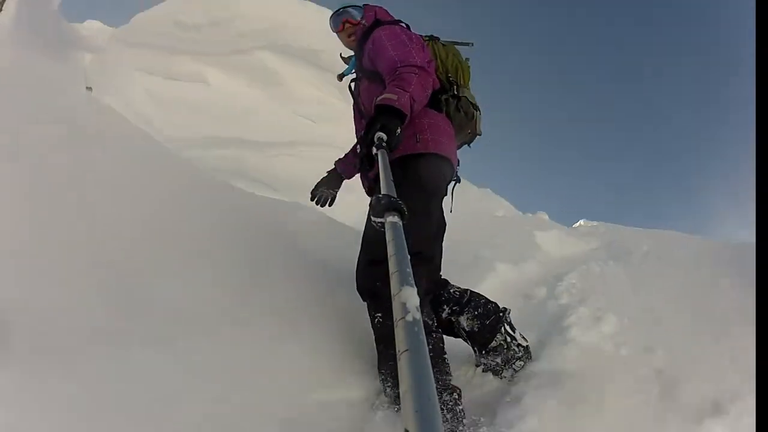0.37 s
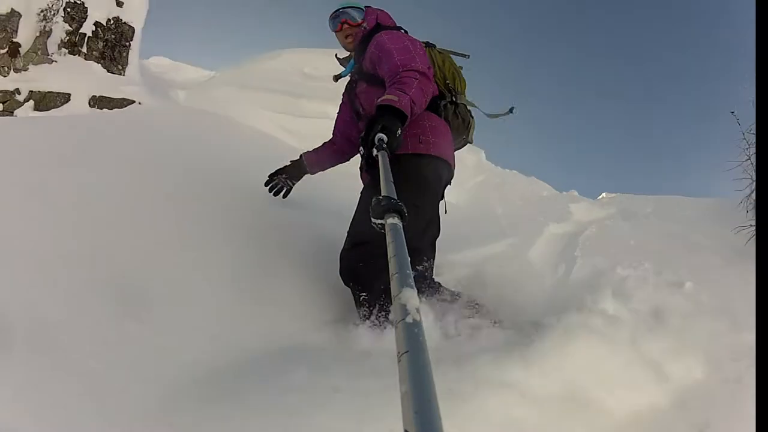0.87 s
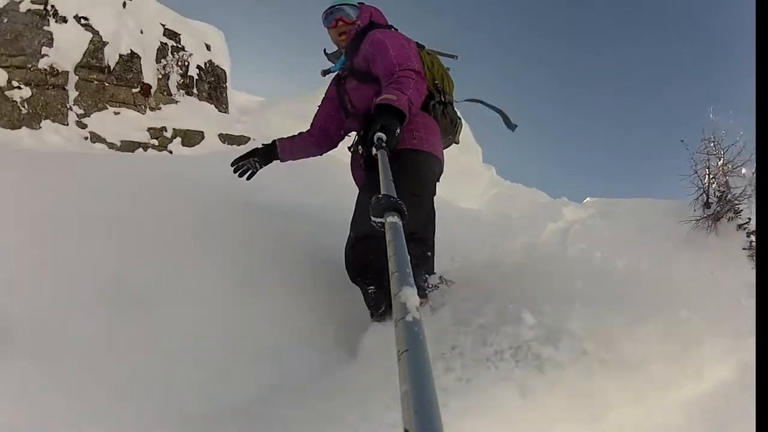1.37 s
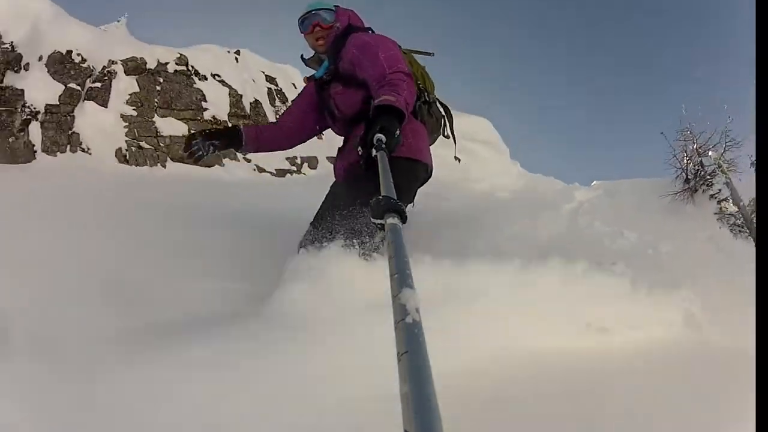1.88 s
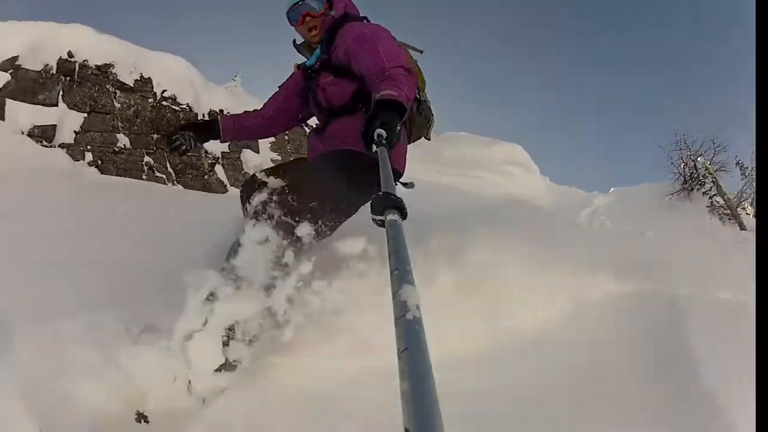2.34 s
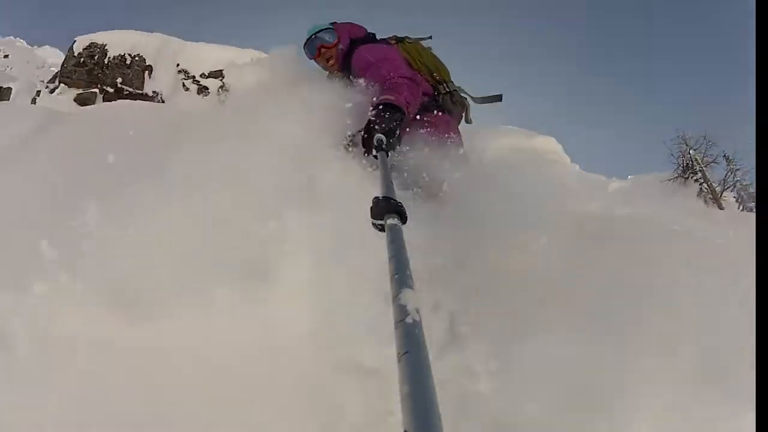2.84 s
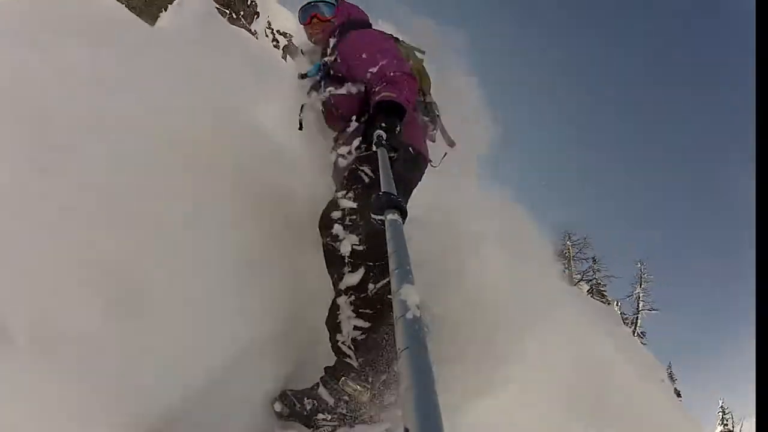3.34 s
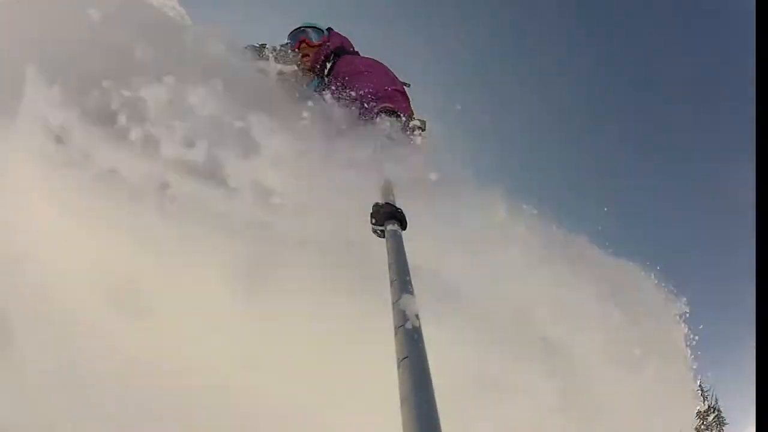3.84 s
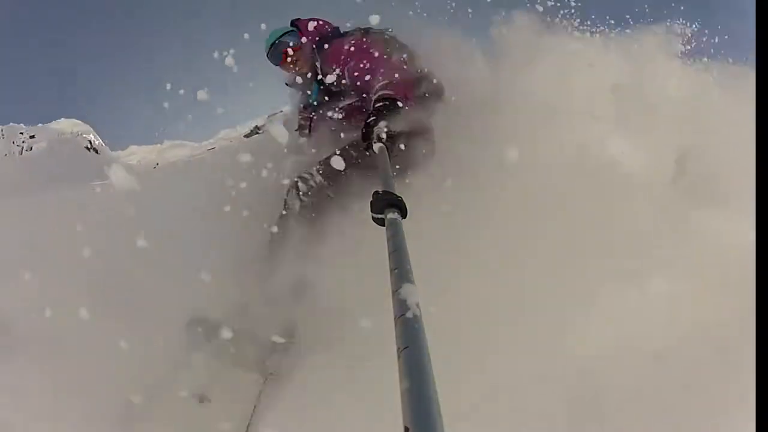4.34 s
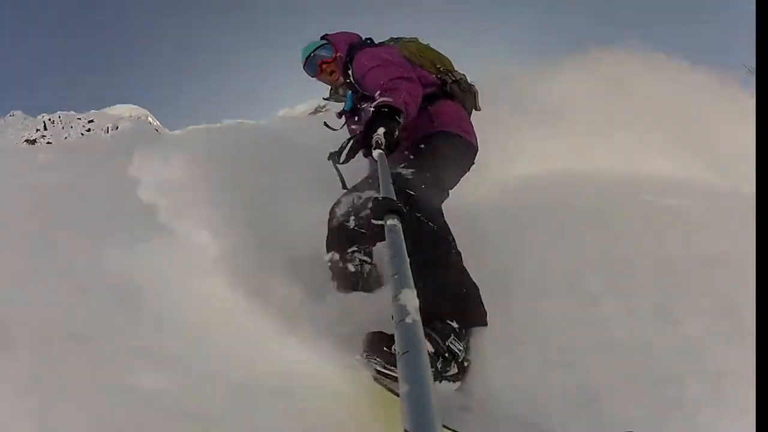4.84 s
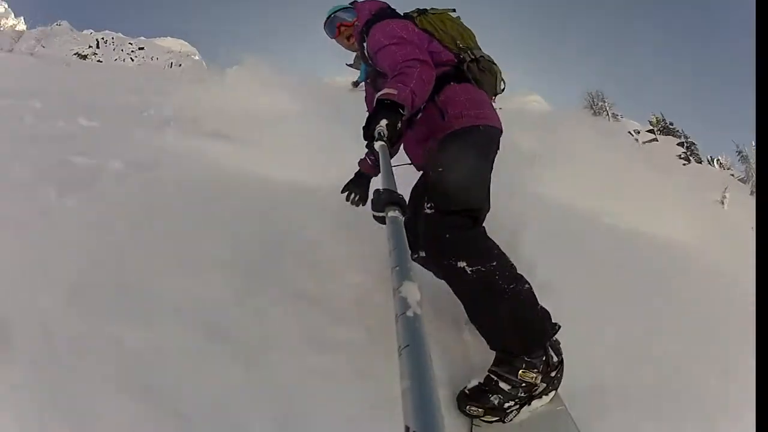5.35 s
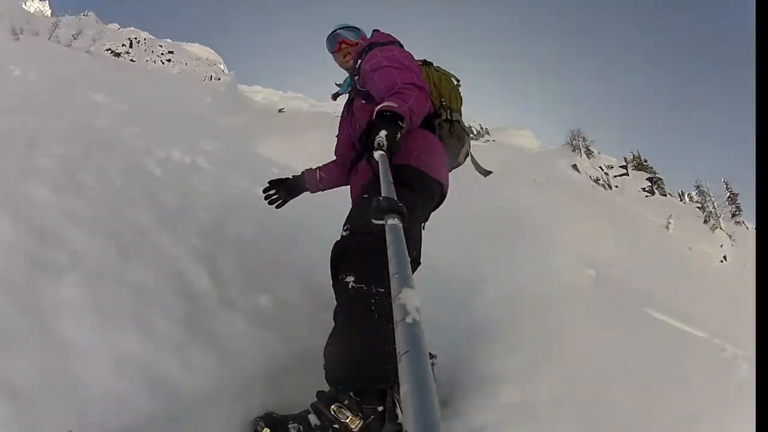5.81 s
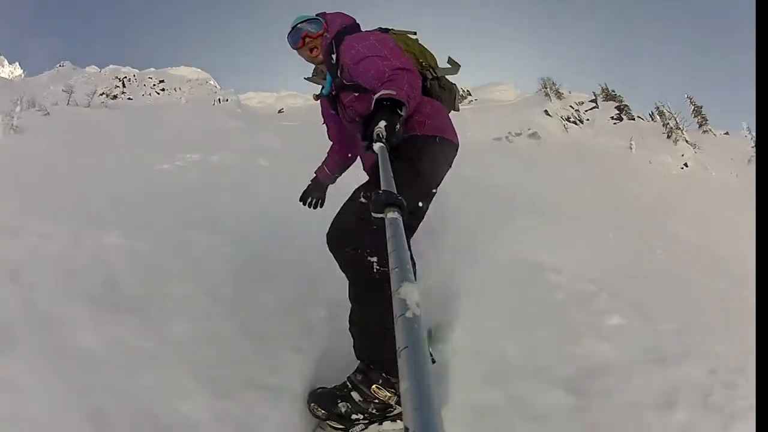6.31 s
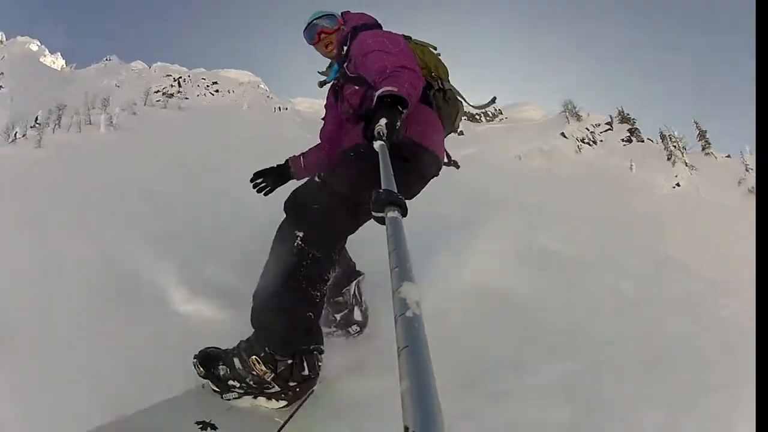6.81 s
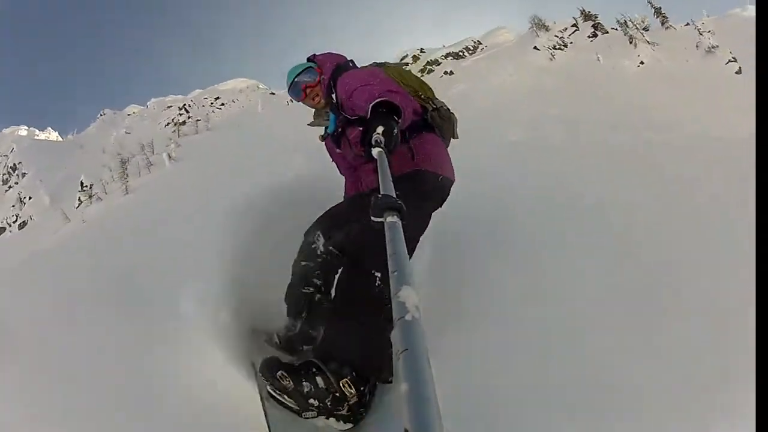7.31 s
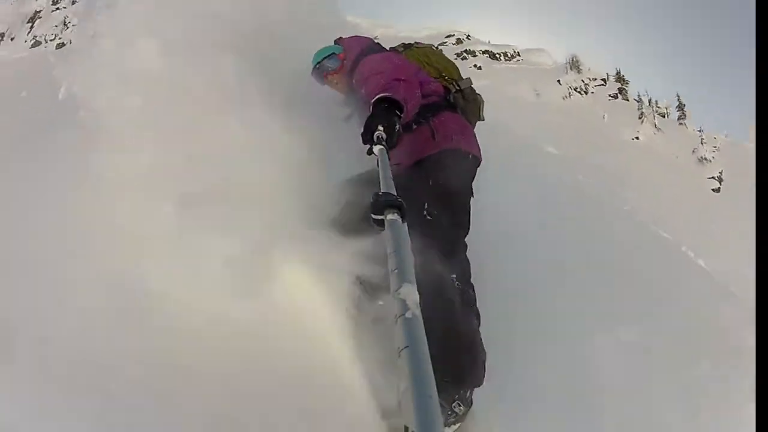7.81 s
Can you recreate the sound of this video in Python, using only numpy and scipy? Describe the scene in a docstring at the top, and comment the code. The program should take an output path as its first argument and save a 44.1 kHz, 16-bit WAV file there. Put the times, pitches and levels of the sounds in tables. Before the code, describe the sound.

Snowboard hissing through deep powder, heard from inside a sealed camera housing, faint at first, then louder, with thumps, knocks, ticks and wind rumble.

```python
"""A deep powder slope, heard from inside a sealed camera housing that a snowboarder holds on a pole.
Wind thumps the housing and rumble comes and goes; the board hisses and crackles, the pole hums with shocks.
Snow lumps knock, ice crumbs tick, the latch rattles, powder spatters, the arm jolts and the mount squeaks.
Noise follows tables of spectrum and level; blows and grains ring the modes of the housing's parts.
At the microphone the sound is held sample by sample at 12 kHz, which mirrors it into the treble."""
import sys
import numpy as np
from scipy import signal
from scipy.fft import rfft, irfft, next_fast_len
from scipy.io import wavfile
from scipy.ndimage import uniform_filter1d

SR = 44100
rng = np.random.default_rng(int(sys.argv[2]) if len(sys.argv) > 2 else 0)


def dump(signal):
    """Clip the signal to [-1, 1] and save it as 16-bit WAV at the path in sys.argv[1]."""
    limited = np.clip(np.atleast_2d(signal).T, -1, 1)
    pcm = np.round(limited * 32767).astype(np.int16)
    wavfile.write(sys.argv[1], SR, pcm)


def linear_from_db(decibels):
    """Turn decibels (scalar or array-like) into linear amplitude factors; 0 gives 1."""
    return 10 ** (np.asarray(decibels, float) / 20)


N = 360738  # length in samples

# Noise spectra, shape only: f/Hz, level/dB per Hz
WIND_SPECTRUM = [(10, -10), (22, 5), (36, -7.5), (55, -24.5), (100, -30), (300, -45.5), (500, -43),
                 (2000, -86)]
RUMBLE_SPECTRUM = [(40, -32), (75, -7), (110, 6), (150, -19.5), (200, -11), (255, -12), (310, -18.5),
                   (500, -35), (2000, -40)]
AIR_SPECTRUM = [(100, 5.5), (500, -2.5), (1250, -7), (2000, -16), (3600, -8), (5800, -13)]
# The board's hiss as it comes through the housing wall, shape only: f/Hz, level/dB per Hz
HISS_SPECTRUM = [(190, -45), (330, -25), (424, -18.5), (643, -14.5), (797, 1), (1060, -10), (1270, 0.5),
                 (1590, -4), (1930, 0.5), (2330, -3), (2750, -14.5), (3450, -9.5), (3990, -19.5),
                 (4880, -18), (5700, -22), (7410, -102), (12500, -120)]

# Ringing modes of each part of pole and housing: f/Hz, relative level/dB, time to fall by 60 dB/s
PART_MODES = {"pole": [(223.4, 14.5, 0.12), (288.4, 1.5, 0.038)], "mount": [(251.8, 5.5, 0.54)],
              "back": [(529, 2, 0.015), (763, 8, 0.033), (911, -2.5, 0.062), (990, -1, 0.03),
              (1283, 6, 0.034)], "walls": [(1450, 7, 0.013), (1816, 8, 0.024), (2298, 7, 0.021)],
              "lens": [(2670, -1, 0.0013), (3315, -0.5, 0.0094), (4110, -17.5, 0.0091)],
              "latch": [(4540, 5.5, 0.001), (5270, -0.5, 0.012)]}

# How hard the board drives through the powder, as the gain of its hiss: t/s, level/dB
CARVE = [(0.0, -71.5), (0.85, -70), (1.05, -64), (1.4, -72), (2.4, -71.5), (2.74, -62.5), (2.8, -55),
         (3.05, -54.5), (3.22, -49), (3.7, -50.5), (3.95, -49), (4.4, -52.5), (4.65, -51), (5.0, -53.5),
         (5.4, -49.5), (5.52, -45.5), (5.9, -49), (6.22, -42), (6.5, -44.5), (6.8, -39), (7.4, -41.5),
         (7.7, -47), (8.18, -47)]
# Swells in the level of the low wind noise: t/s of the peak, level/dB, length/s
WIND_SWELLS = [(0.9, -37.5, 0.53), (1.58, -37, .15), (1.956, -38.5, 0.35), (2.56, -36, 0.39),
               (3.404, -32.5, .15), (3.708, -28, 0.14), (4.305, -35, 0.42), (4.71, -35.5, 0.28),
               (4.89, -36, 0.19), (5.102, -32.5, 0.16), (5.413, -41, .12), (5.79, -36, 0.17),
               (6.063, -31, 0.47), (6.793, -33, .15), (7.003, -36.5, 0.12), (7.398, -37, 0.29),
               (7.597, -34, 0.15), (8.02, -29, 0.27)]
# The board runs over rough snow: t/s of the peak, level/dB, length/s
BUMPS = [(0.503, -53.5, 0.14), (1.406, -50, 0.095), (1.8, -60, 0.13), (2.236, -46.5, 0.33),
         (2.611, -45.5, 0.14), (2.887, -46, 0.33), (3.69, -39.5, 0.14), (4.05, -39, 0.46),
         (4.632, -48, 0.16), (5.087, -46.5, .12), (5.545, -65, .2), (6.1, -43, 0.17), (6.303, -53, .12),
         (6.732, -36, 0.16), (7.0, -39, 0.2), (7.19, -34.5, 0.18), (7.493, -46.5, .12), (7.944, -44, 0.34)]
# Spells of hard shaking up the arm: t/s of the peak, level/dB, length/s
SHAKES = [(0.695, -58, .2), (1.109, -50.5, 0.11), (1.69, -56, .12), (1.9, -64, .12), (2.324, -54, .12),
          (2.514, -50, 0.094), (2.92, -47, 0.19), (3.185, -46, 0.23), (3.916, -35, 0.16),
          (4.04, -37.5, 0.23), (4.36, -39, .2), (4.695, -44, 0.32), (6.023, -47, .15), (6.458, -44, 0.28),
          (7.1, -41.5, 0.14), (7.643, -41, 0.71), (7.813, -44, 0.17)]

# Lumps of snow and bumps: t/s, back level/dB, pole level/dB, walls level/dB, crumbling/ms
KNOCKS = [(0.0925, -51, -35.5, -53, 1.7), (0.56, -71, -48, -72, 4.1), (2.138, -39.5, -28.5, -40.5, 0.7),
          (2.207, -56, -57, -64, 0.4), (2.258, -61, -39.5, -74, 1.9), (2.316, -49.5, -61, -52, 0.2),
          (2.64, -53, -65, -66, 1.1), (2.69, -55.5, -66, -56, 0.34), (2.82, -71, -67, -48, 0.3),
          (3.568, -69, -36.5, -66, 1.5), (3.8512, -37, -37, -21, 1.64), (3.8695, -17.5, -17.5, -28, 0.96),
          (3.966, -34.5, -31, -38, 2), (3.948, -35, -30, -43, 2.2), (4.006, -45, -22, -47, 2.9),
          (4.027, -47, -28, -50, 1.5), (4.209, -47, -40.5, -45, 1.9), (4.499, -50, -41, -67, 1.6),
          (4.583, -64, -44.5, -38, 0.29), (4.594, -47, -34, -65, 5.5), (5.099, -66, -50, -36.5, 0.19),
          (5.428, -51, -42, -35.5, 0.17), (5.594, -62, -57, -38.5, 0.2), (6.019, -11, -13.5, -19, 0.18),
          (6.0615, -42, -41, -29, 0.25), (6.12, -66, -32.5, -60, 1.8), (6.175, -31.5, -40, -27, 0.53),
          (6.186, -21, -24, -22, 0.2), (6.4015, -34, -38, -26, 0.67), (6.7105, -59, -47, -34, 0.44),
          (6.759, -22, -50, -17.5, 1.6), (6.7635, -31, -25, -21, 0.16), (7.165, -60, -35, -46, 1.3),
          (7.639, -44, -36.5, -52, 1.4), (7.899, -31.5, -24, -23.5, 1.2)]
# The loose latch rattles: t/s, level/dB, rattling/ms
RATTLES = [(1.4187, -55, 4.4), (1.426, -54, 0.46), (1.508, -52.5, 0.36), (1.5205, -59, 1.2),
           (1.5783, -53, .6), (1.9168, -59, .4), (2.2166, -50, 0.67), (2.25, -61, 1.6), (2.3019, -44, 4),
           (2.311, -54, 2.3), (2.399, -48, 1.2), (2.4613, -55, .45), (2.4668, -52.5, 2.1),
           (2.5027, -53, 1.8), (2.5523, -51, 1.5), (2.59, -46.5, 1.5), (2.9465, -59, 1.3),
           (3.034, -51, 0.84), (3.071, -55, 1.1), (3.1266, -56, 2.1), (3.532, -52, 1), (3.7447, -51, 2.2),
           (3.763, -40.5, .8), (5.1233, -47, .5), (5.181, -46.5, .3), (5.2035, -57, 1.2),
           (5.5338, -39.5, 0.74), (6.0035, -51, 1.1), (8.107, -51, .3)]
# Jolts of the arm, one slow swing each: t/s, level/dB, f/Hz
JOLTS = [(1.649, -36, 31), (2.887, -26, 27), (3.684, -32, 27.7), (3.763, -25.5, 27.3), (4.038, -28, 30),
         (4.869, -27, 30), (5.974, -23, 24), (6.045, -20, 25.5), (6.705, -13.5, 36.5), (7.917, -20.5, 33.2)]
# Ice crumbs on the lens cover: t/s, level/dB
CRUMBS = [(2.152, -53), (2.2323, -44), (2.5124, -54), (2.5341, -38.5), (3.087, -41.5), (3.3896, -40.5),
          (3.687, -31), (3.716, -36.5), (3.8515, -24), (4.2156, -33), (4.251, -35.5), (4.299, -40.5),
          (4.4006, -49), (4.434, -53), (4.4457, -38.5), (4.581, -40), (5.3596, -36.5), (6.0193, -31.5),
          (6.0508, -28), (6.1873, -29), (6.4004, -46), (6.4464, -42), (6.7073, -24.5), (6.758, -25),
          (6.7638, -17), (7.8986, -33.5), (7.9056, -35), (7.92, -30), (7.985, -36.5), (8.0403, -36.5),
          (8.082, -51)]
# A cloud of powder pelts the housing: t/s, level/dB
SPATTER = [(3.88, -62), (3.9, -58), (3.945, -40), (3.975, -44), (4.01, -49), (4.07, -49.5), (4.12, -52),
           (4.16, -53)]
# The mount squeaks: t/s, length/s, f/Hz at the start, level/dB
SQUEAKS = [(5.843, 0.026, 2310, -39.5), (5.853, 0.055, 4590, -48), (5.91, .015, 4800, -58),
           (5.94, 0.049, 4680, -56)]

FULL_CARVE_DB = -45  # hiss gain of a full carve
# Beds: level/dB at a full carve, share of the carve's dB changes that the bed follows
WIND_BED, RUMBLE_BED, POLE_BED = (-43, 0.11), (-50.5, 0.5), (-46, 0.56)
AIR_DB = -64.5
RATTLE_LENS_DB, RATTLE_WALLS_DB = -9, -12.5  # relative to the latch
CRUMB_LATCH_DB, CRUMB_WALLS_DB, CRUMB_MS = -18, -7.5, 0.23  # levels relative to the lens cover
HOLD_HZ = 12000
SELF_NOISE_DB = -77  # wide-band hiss of the electronics, ahead of the last low-pass


def evened(x):
    """Scales to rms 1."""
    return x / np.sqrt(np.mean(x ** 2) + 1e-20)


def drift(count, width):
    """Random wander of rms 1, smoothed over a number of points."""
    return evened(uniform_filter1d(rng.standard_normal(count), size=width))


def read_spectrum(points, hz):
    """Reads a spectrum table on a log-frequency axis."""
    f, level = np.transpose(points)
    return np.interp(np.log(hz + 1), np.log(f + 1), level)


def noise(spectrum, size, patchy_db, flicker_db):
    """Random short-time spectra with drifting patches and a flicker shared by all bins."""
    frames = 4 * N // size + 5
    hz = np.fft.rfftfreq(size, 1 / SR)
    real, imaginary, patches = rng.standard_normal((frames, len(hz), 3)).T
    patches = uniform_filter1d(patches, size=8, axis=0)  # across frequency
    patches = evened(uniform_filter1d(patches, size=10, axis=1))  # across time
    flicker = drift(frames, 3)
    level_db = read_spectrum(spectrum, hz)[:, None] + patchy_db * patches + flicker_db * flicker
    bins = (real + 1j * imaginary) * linear_from_db(level_db)
    sound = signal.istft(bins, nperseg=size, noverlap=3 * size // 4)[1]
    return evened(sound[:N])


def carve_db():
    """Hiss gain of the board over time, in dB."""
    return np.interp(np.arange(N) / SR, *np.transpose(CARVE))


def ride(bed, surges):
    """Gain over time: a bed that follows the carve, plus smooth swells around their peaks, added as power."""
    full_db, share = bed
    t = np.arange(N) / SR
    power = linear_from_db(full_db + share * (carve_db() - FULL_CARVE_DB)) ** 2
    for peak_s, peak_db, length in surges:
        power += linear_from_db(peak_db) ** 2 * np.exp(-(4 * (t - peak_s) / length) ** 2)
    return np.sqrt(power)


def ring(force, part):
    """The modes of one part, set ringing by a force; neighbouring modes swing in opposite sense."""
    t = np.arange(SR // 4) / SR
    modes = np.zeros(len(t))
    for k, (hz, db, t60) in enumerate(PART_MODES[part]):
        modes += (-1) ** k * linear_from_db(db - 60 * t / t60) * np.sin(2 * np.pi * hz * t)
    return signal.oaconvolve(force, modes)


def grains(per_s, spread_db, parts):
    """Random small impacts, a few large, ringing the named parts."""
    size = linear_from_db(spread_db * rng.exponential(1, N)) * rng.choice([-1, 1], N)
    hits = size * (rng.random(N) < per_s / SR)
    return evened(sum(ring(hits, part)[:N] for part in parts))


def add(mix, s, sound):
    """Mixes a sound in at s seconds."""
    part = mix[round(s * SR):][:len(sound)]
    part += sound[:len(part)]


def blows(rows, parts, rough, soft_hz):
    """Each blow is a push followed by a few ms of crumbling; it rings each part by its own amount."""
    out = np.zeros(N)
    ms = np.arange(1000) * 1000 / SR
    keep = np.exp(-2 * np.pi * soft_hz / SR)
    for s, *levels_db, length_ms in rows:
        crumbling = np.exp(-(ms / np.clip(length_ms, 0.05, 8) - 0.6) ** 2)
        force = rough * rng.standard_normal(len(ms)) * crumbling
        force[0] = 1
        # a soft body spreads the push in time: two-pole low-pass
        force = signal.lfilter([1], [1, -2 * keep, keep ** 2], force)
        for part, db in zip(parts, levels_db):
            sound = ring(force, part)
            loudest = np.sqrt(uniform_filter1d(sound ** 2, size=140).max())  # rms over about 3 ms
            add(out, s, linear_from_db(db) * sound / loudest)
    return out


def wind():
    """Wind on the housing: low, thumping noise that swells and sinks."""
    return ride(WIND_BED, WIND_SWELLS) * noise(WIND_SPECTRUM, size=4096, patchy_db=1.8, flicker_db=2.0)


def rumble():
    """The board on rough snow: low, flickering noise that grows with the carve."""
    return ride(RUMBLE_BED, BUMPS) * noise(RUMBLE_SPECTRUM, size=1024, patchy_db=0.5, flicker_db=4.0)


def air():
    """Steady air: a faint noise whose mean level does not follow the carve."""
    return linear_from_db(AIR_DB) * noise(AIR_SPECTRUM, size=1024, patchy_db=2.5, flicker_db=1.9)


def pole():
    """Uneven small shocks up the arm keep the low modes of pole and mount humming."""
    shocks = rng.standard_normal(N) * linear_from_db(1.7 * drift(N, 600))
    hum = evened(ring(shocks, "pole")[:N] + ring(shocks, "mount")[:N])
    return ride(POLE_BED, SHAKES) * hum


def board():
    """Powder sliding under the board: a dense hiss with fine crystals crackling in it."""
    hiss = noise(HISS_SPECTRUM, size=512, patchy_db=2.0, flicker_db=0.83)
    crackle = grains(400, 2.0, ("walls", "lens"))
    return linear_from_db(carve_db()) * (1.075 * hiss + 0.28 * crackle)


def knocks():
    """Lumps of snow and bumps: soft blows that ring the back, the pole and the walls."""
    return blows(KNOCKS, ("back", "pole", "walls"), rough=0.17, soft_hz=1600)


def rattles():
    """The loose latch chatters: hard, rough blows that ring the latch and stir the lens cover and walls."""
    rows = [(s, db + RATTLE_LENS_DB, db, db + RATTLE_WALLS_DB, ms) for s, db, ms in RATTLES]
    return blows(rows, ("lens", "latch", "walls"), rough=0.6, soft_hz=4500)


def jolts():
    """One soft pressure swing per jolt of the arm, slightly longer than a full cycle."""
    out = np.zeros(N)
    for s, db, hz in JOLTS:
        turn = np.arange(0, 1.12, hz / SR)  # in cycles
        fade = signal.windows.tukey(len(turn), 0.4) * np.exp(-0.5 * turn)
        add(out, s, linear_from_db(db) * np.sin(2 * np.pi * turn) * fade)
    return out


def crumbs():
    """Ice crumbs tick: hard, short blows that ring the lens cover and stir the latch and walls."""
    rows = [(s, db, db + CRUMB_LATCH_DB, db + CRUMB_WALLS_DB, CRUMB_MS) for s, db in CRUMBS]
    return blows(rows, ("lens", "latch", "walls"), rough=0.6, soft_hz=4500)


def spatter():
    """Powder pelts the housing: dense grains, mostly on the back, swelling and thinning out."""
    s, db = np.transpose(SPATTER)
    level = linear_from_db(np.interp(np.arange(N) / SR, s, db, left=-120, right=-120))
    return level * (grains(93, 3.4, ("back",)) + 0.5 * grains(250, 2.3, ("walls",)))


def squeaks():
    """Short, rough, rising tones from rubbing plastic."""
    out = np.zeros(N)
    for s, length, hz, db in SQUEAKS:
        t = np.arange(0, length, 1 / SR)
        waver = drift(len(t), 150)  # shakes pitch and level together
        turns = np.cumsum(hz * (1 + 0.6 * t + 0.019 * waver)) / SR
        add(out, s, linear_from_db(db + 1.9 * waver) * np.sin(2 * np.pi * turns) * np.hanning(len(t)))
    return out


def scene():
    """All that reaches the microphone inside the housing, as one channel."""
    steady = wind() + rumble() + air() + pole() + board()
    events = knocks() + rattles() + jolts() + crumbs() + spatter() + squeaks()
    return (steady + events)[None]


def top_cut(x):
    """Nothing passes above the cut-off."""
    return signal.sosfilt(signal.butter(12, 16530, fs=SR, output="sos"), x)


def record(dry):
    """Band limit below half the hold rate; holding each sample mirrors the spectrum under a sinc slope."""
    size = next_fast_len(N + SR)
    hz = np.fft.rfftfreq(size, 1 / SR)
    t = np.arange(size) / SR
    limited = irfft(rfft(dry, size) / (1 + (hz / 5850) ** 80), size)
    mirrored = limited * (1 + 2 * np.cos(2 * np.pi * HOLD_HZ * t))
    held = rfft(mirrored) * np.sinc(hz / HOLD_HZ)
    self_noise = rfft(linear_from_db(SELF_NOISE_DB) * rng.standard_normal(size))
    mix = irfft((held + self_noise) / (1 + (hz / 15300) ** 70), size)[:, :N]
    return top_cut(mix)


dry = scene()
out = record(dry)
dump(out)
```